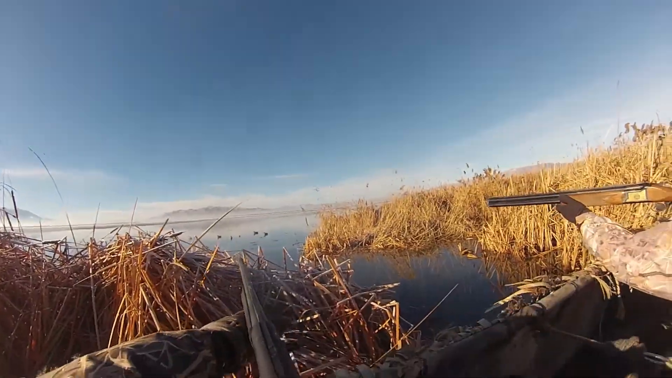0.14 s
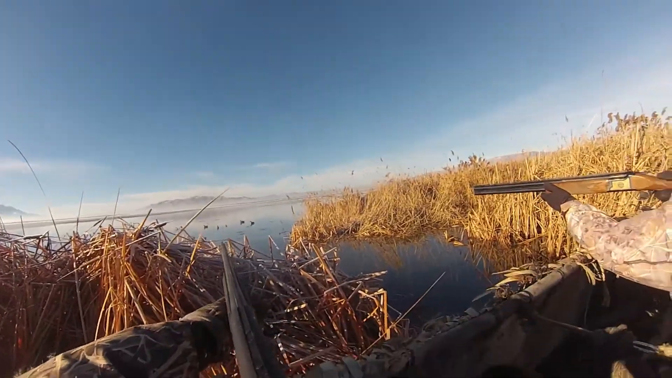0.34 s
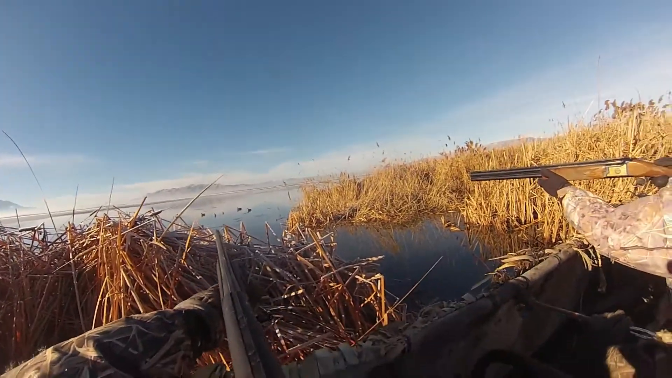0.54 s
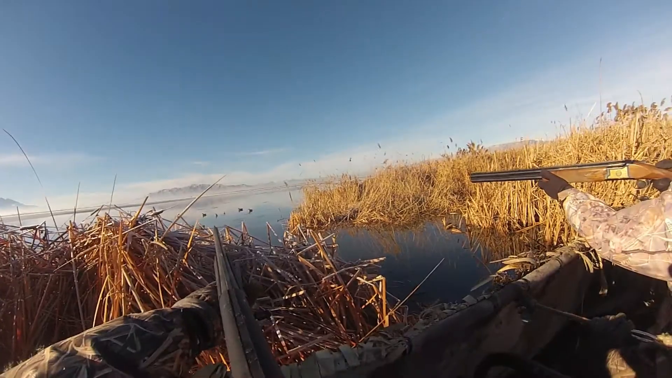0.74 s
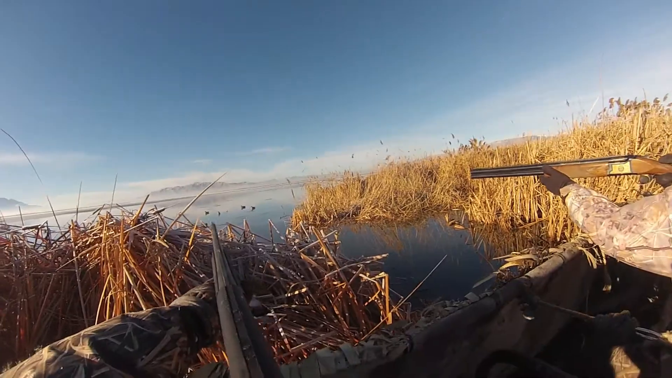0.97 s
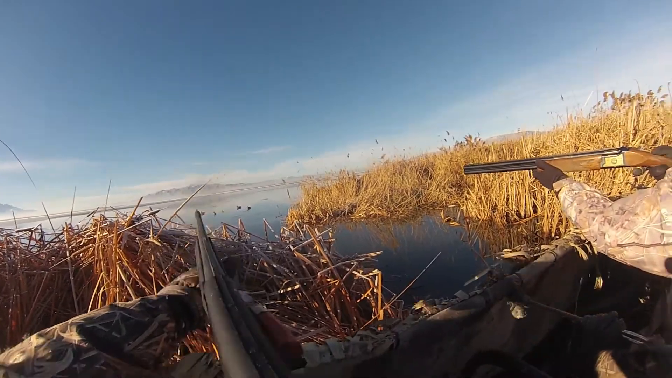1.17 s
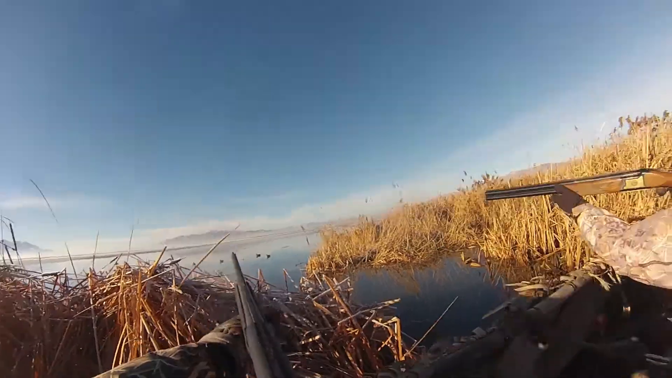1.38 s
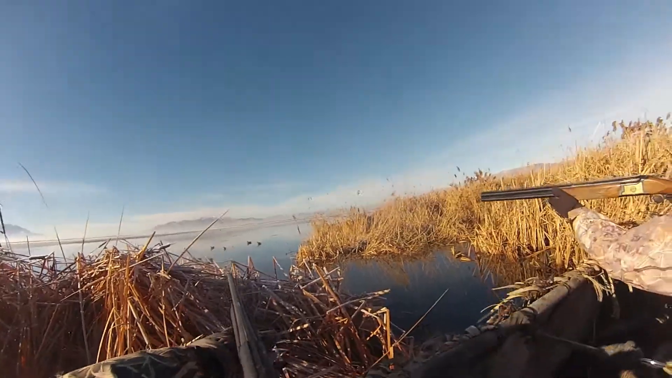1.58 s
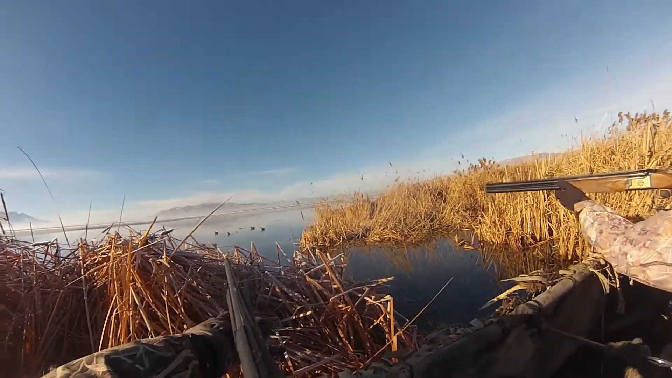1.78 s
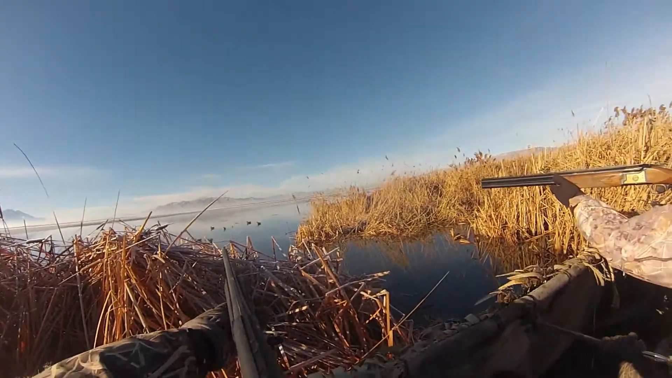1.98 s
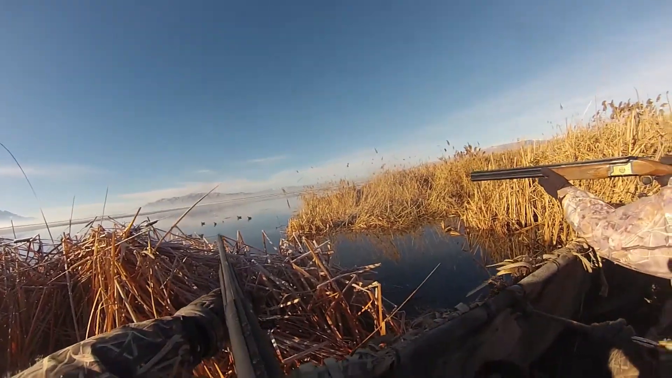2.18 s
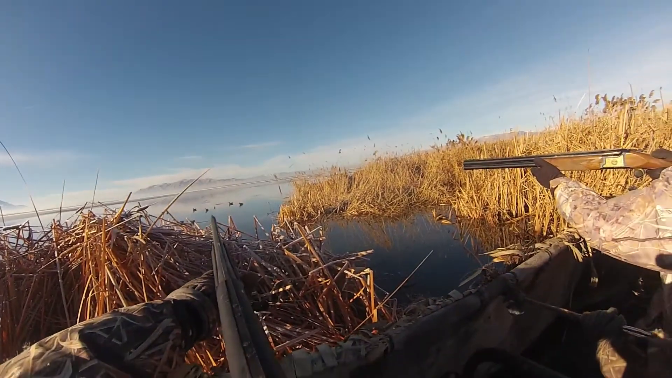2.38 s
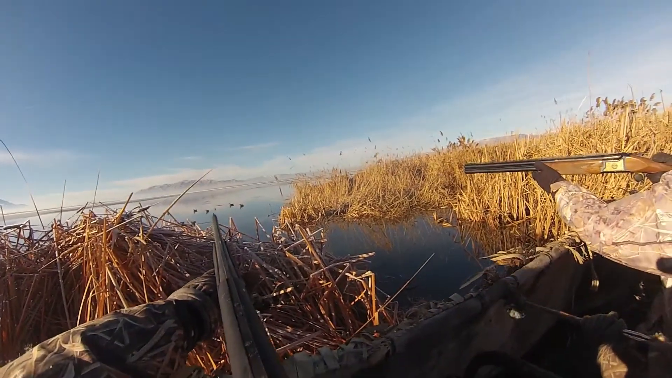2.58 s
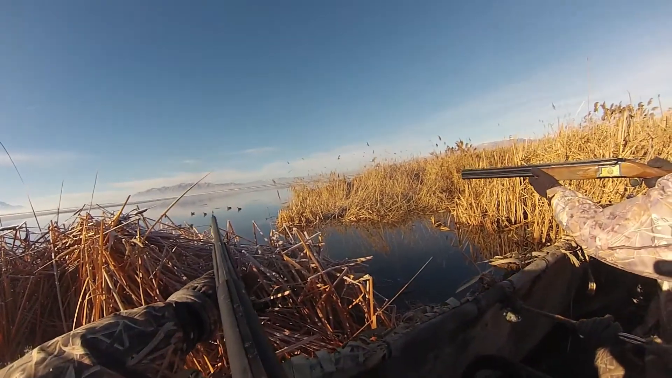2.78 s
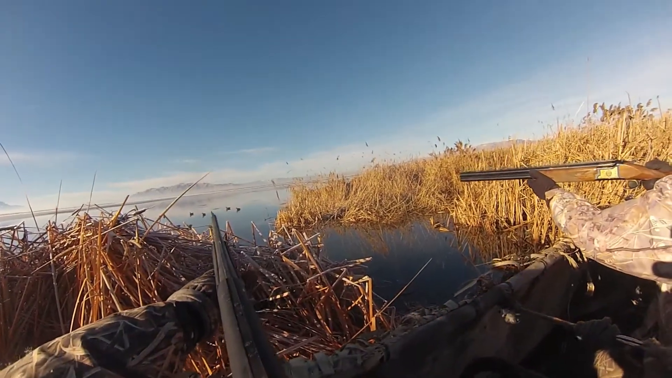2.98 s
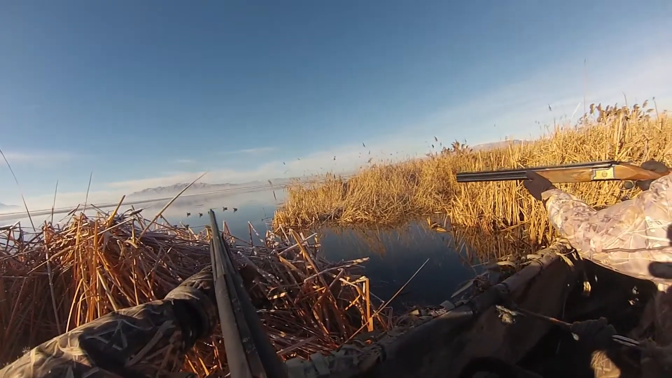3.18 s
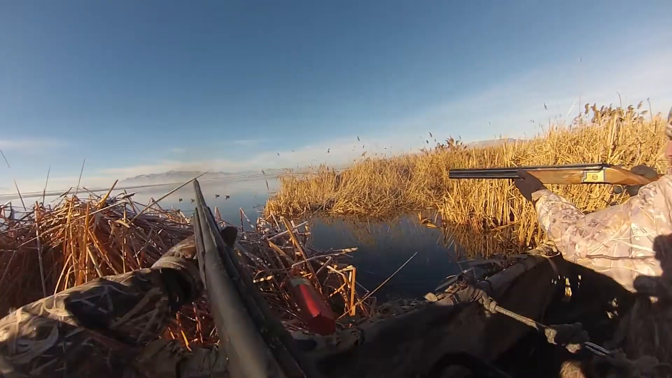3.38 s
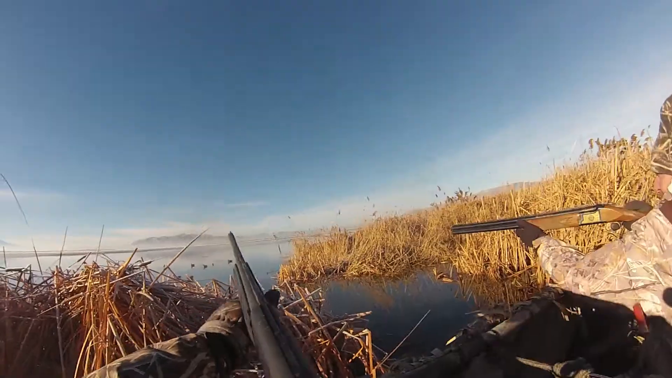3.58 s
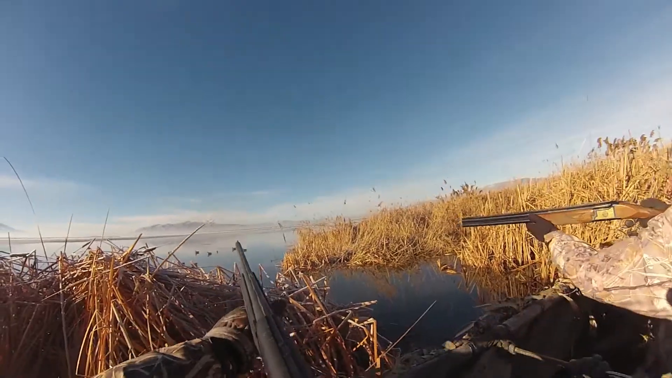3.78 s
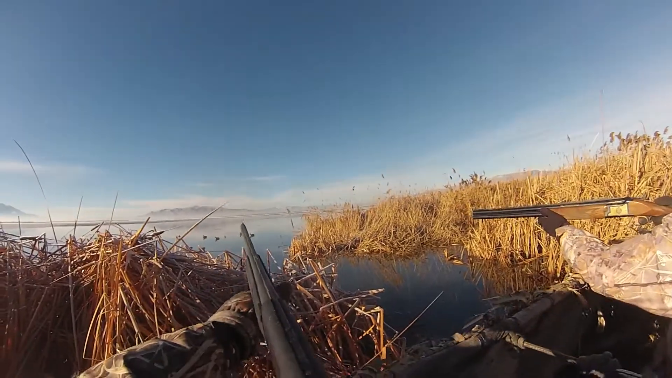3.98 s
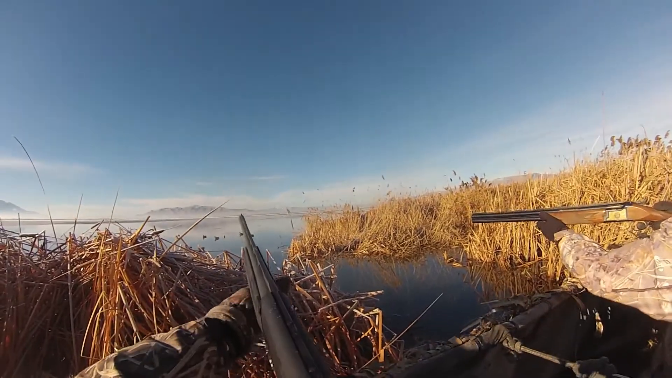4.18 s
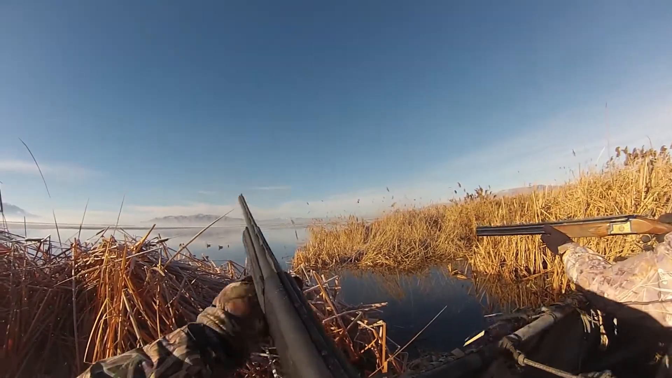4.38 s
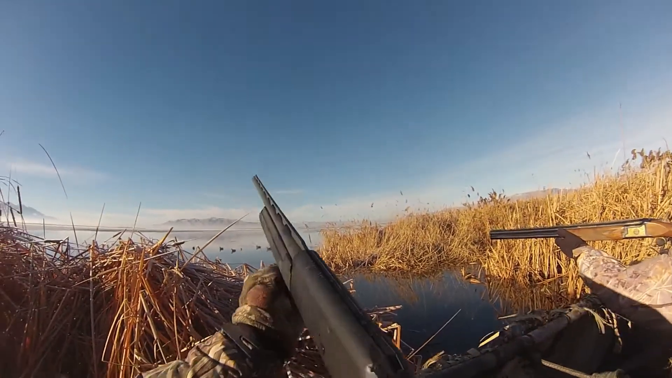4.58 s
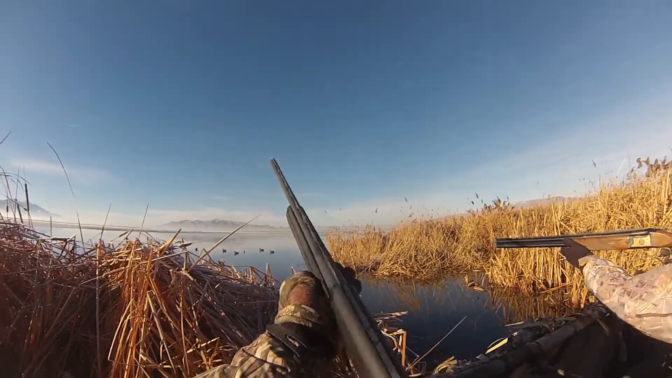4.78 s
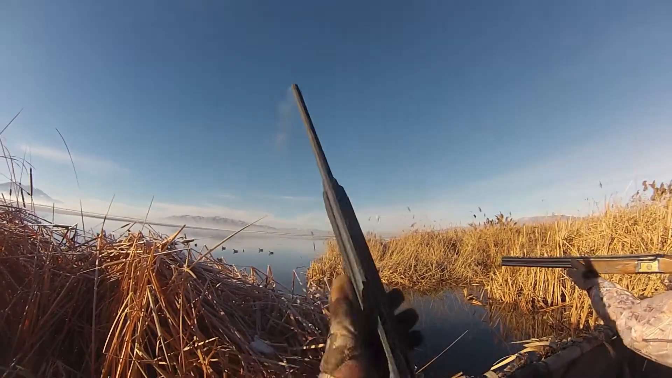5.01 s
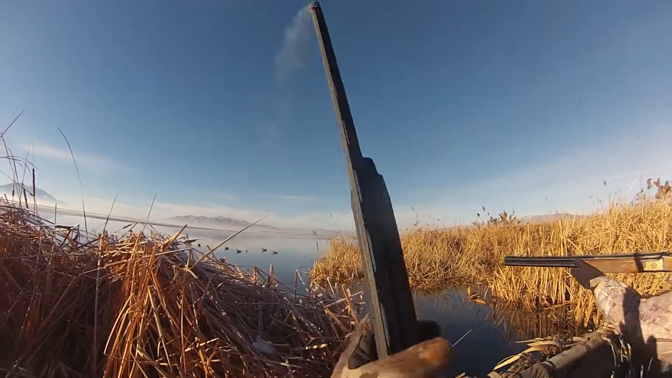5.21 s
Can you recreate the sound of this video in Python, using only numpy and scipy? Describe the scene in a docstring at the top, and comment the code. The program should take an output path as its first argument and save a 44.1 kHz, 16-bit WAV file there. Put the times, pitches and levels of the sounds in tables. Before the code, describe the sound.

Two close shotgun blasts almost together, then a third, each rolling away over open marsh, with small knocks and clicks between.

```python
"""The echo of an earlier shot dies away over a calm marsh. Two hunters then fire shotguns from a small
boat hidden in reeds, so close to a camera that its microphone overloads. Each blast is a pair of
pressure fronts that scatter in the reeds and roll back from the far shore and hills, duller with
distance. Spent shells and gear excite the boat's resonant modes, and a sleeve rustles by friction
as a gun is raised."""
import sys
import numpy as np
from scipy import signal
from scipy.fft import rfft, irfft
from scipy.io import wavfile
from scipy.ndimage import uniform_filter1d

SR = 44100
rng = np.random.default_rng(int(sys.argv[2]) if len(sys.argv) > 2 else 0)


def wrap_up_sound(samples):
    """Save the sound to the file named by the first command line argument, as 16-bit audio."""
    columns = np.atleast_2d(samples).T
    # keep every value between -1 and 1, then stretch to whole-number steps
    tamed = np.clip(columns, -1, 1)
    steps = np.round(tamed * 32767).astype(np.int16)
    wavfile.write(sys.argv[1], SR, steps)


N = 231425

# Spectrum of the muzzle crack (frequency [Hz], level [dB])
CRACK_SPECTRUM = [(60, -40), (250, -14.5), (600, -2), (1200, -5), (1900, -3), (2900, 0), (4200, -4),
                  (7000, -7), (10000, -6), (15000, -13.5)]


def undb(db):
    """Amplitude ratio of a level in decibels."""
    return 10 ** (np.asarray(db) / 20)


def unit(x):
    """Normalisation to an rms of 1."""
    return x / np.sqrt(np.mean(x ** 2))


def clock(seconds):
    """Sample times in seconds."""
    return np.arange(int(seconds * SR)) / SR


def fade(t, t60):
    """Exponential decay from t = 0, falling 60 dB in t60 seconds."""
    return (t >= 0) * np.exp(-np.log(1000) * np.abs(t) / t60)


def ring(t, hz, t60):
    """Free vibration of one struck mode: a damped sinusoid."""
    return np.sin(2 * np.pi * hz * t) * fade(t, t60)


def add(out, start, sound):
    """Superposition: mix a sound in at a time in seconds; what falls outside is lost."""
    i = int(round(start * SR))
    lo, hi = max(i, 0), min(i + len(sound), len(out))
    if hi > lo:
        out[lo:hi] += sound[lo - i:hi - i]


def noise(spectrum, size):
    """Spectral shaping: noise of rms 1 that follows (frequency [Hz], level [dB]) points."""
    hz, db = np.transpose(spectrum)
    bin_hz = np.maximum(np.fft.rfftfreq(size, 1 / SR), 1)
    gain = undb(np.interp(np.log(bin_hz), np.log(hz), db))
    return unit(irfft(rfft(rng.standard_normal(size)) * gain, size))


def walk(rate, size):
    """Random modulation: ramps between `rate` random values a second, with a spread near 1."""
    hold = max(int(SR / rate), 1)
    steps = np.repeat(rng.standard_normal(size // hold + 1), hold)
    return unit(uniform_filter1d(steps, hold))[:size]


def bell(hz, centre_hz, octaves):
    """Gaussian weighting of height 1 on a logarithmic frequency axis."""
    return np.exp(-(np.log2(hz / centre_hz) / octaves) ** 2)


def air():
    """Ambient noise: the low, slightly restless rumble of a calm morning."""
    # Spectrum of the rumble (frequency [Hz], level [dB])
    air_spectrum = [(12, -31), (20, -7), (42, 1), (122, -6.5), (157, -8.5), (259, -12.5), (298, -21.5),
                    (404, -16.5), (881, -27), (958, -30.5), (1720, -36), (6720, -43), (15500, -49.5)]
    return noise(air_spectrum, N) * undb(-65 + 0.73 * walk(12, N))


def sleeve():
    """Friction noise: cloth slides over dry stems in tiny catches; each stroke builds, holds and dies."""
    # Spectrum of rubbing cloth (frequency [Hz], level [dB])
    cloth_spectrum = [(100, -6.5), (300, 0.5), (550, 2), (1000, -6.5), (2400, -11.5), (3600, -16.5),
                      (8000, -21.5), (15000, -28)]
    # Sleeve strokes (time [s], duration [s], level [dB], favoured frequency [Hz], boost [dB])
    strokes = [(0, .07, -84, 5000, -2), (2.119, 0.15, -80.5, 2200, 3), (3.12, 0.14, -87, 1890, 13),
               (4.378, .15, -71, 1291, -0.5), (4.532, .05, -71.5, 9100, 10), (4.701, .18, -63.5, 2400, 4),
               (5.024, .06, -68.5, 2440, 8), (5.12, .15, -74.5, 3000, 3)]
    attack_s, release_s, lead_s = 0.037, .035, 1 / 4
    catch_db, catches_per_s = 1.5, 140
    out, t = np.zeros(N), clock(0.8) - lead_s
    hz = np.geomspace(100, 15000, 40)
    cloth_db = np.interp(hz, *np.transpose(cloth_spectrum))
    for start, length, db, pitch_hz, boost_db in strokes:
        colour = np.column_stack([hz, cloth_db + boost_db * bell(hz, pitch_hz, octaves=0.51)])
        pressure = np.exp(np.minimum(t, 0) / attack_s - np.maximum(t - length, 0) / release_s)
        swish = noise(colour, len(t)) * pressure
        add(out, start - lead_s, swish * undb(db + catch_db * walk(catches_per_s, len(t))))
    return out


def knocks():
    """Impact excitation: shells and gear tick, clatter and ring the modes that the struck spot favours."""
    # Modes of the boat (frequency [Hz], level [dB], decay time t60 [s])
    boat_modes = [(201, -11, 0.095), (267, -3, 0.037), (391.4, 1.5, 0.1), (487.6, -2, 0.14),
                  (538.3, 4, 0.088), (603, 5.5, 0.019), (710, -10, 0.017), (914, -5.5, 0.1),
                  (1130, -9.5, 0.11), (1230, -19.5, 0.13), (1560, -49, .045), (1620, -32, 0.079),
                  (1604, -9.5, 0.11), (1787, 6, 0.023), (1900, 5, 0.019), (2350, -47, .035),
                  (2795, -5, 0.026), (3965, -5.5, 0.026)]
    # Shells, gun parts and gear hitting the boat (time [s], rise time [s], ring level [dB],
    # favoured frequency [Hz], boost [dB], clatter level [dB], tick level [dB])
    impacts = [(.084, 0.00069, -67, 1860, 8, -60, -78), (0.2374, 0.0013, -32, 355, 6.5, -29, -49),
               (0.4549, 0.0014, -51, 453, 16, -45.5, -68), (.513, 0.0095, -60, 452, 20.5, -58, -81),
               (1.709, 0.0015, -44, 1290, 15, -34, -35.5), (1.890, 0.0011, -63, 1500, 1, -59.5, -65),
               (2.099, 0.0022, -52, 260, 15, -39.5, -46), (3.9745, 0.00035, -40.5, 234, 18.5, -36.5, -50),
               (3.978, 0.00025, -34.5, 569, 13.5, -26, -66), (4.012, .0003, -69, 1500, 3, -69, -55),
               (4.165, 0.0011, -66, 1109, 24, -47, -44.5), (4.307, 0.0018, -54.5, 222, 27.5, -61.5, -84),
               (4.315, 0.0016, -66.5, 450, 11, -59, -66), (4.428, .001, -66.5, 1190, 16, -63, -71),
               (4.655, .0005, -70, 1500, -8, -79, -69), (5.021, 0.00084, -72, 2000, -9, -64, -57)]
    # Spectra of the midrange clatter and the brighter tick (frequency [Hz], level [dB])
    clatter_spectrum = [(150, -21), (400, 3.5), (900, 10), (1800, 3.5), (2800, -3), (3500, -17.5),
                        (4500, -15), (9000, -42), (15000, -44)]
    tick_spectrum = [(500, -9), (1500, 4.5), (4000, -4.5), (7500, -8), (12000, -13), (15000, -28)]
    out, t = np.zeros(N), clock(1 / 4)
    for start, rise, ring_db, spot_hz, boost_db, clatter_db, tick_db in impacts:
        body = 0
        for hz, db, t60 in boat_modes:
            mode_db = db + boost_db * bell(hz, spot_hz, octaves=0.29)
            amplitude = rng.choice([-1, 1]) * undb(mode_db + rng.standard_normal())
            body = body + amplitude * ring(t, hz, t60)
        clatter = noise(clatter_spectrum, len(t)) * fade(t, t60=0.073)
        tick = noise(tick_spectrum, len(t)) * fade(t, t60=0.055) * undb(2 * walk(580, len(t)))
        knock = undb(ring_db) * body + undb(clatter_db) * clatter + undb(tick_db) * tick
        add(out, start, knock * (1 - np.exp(-t / rise)))
    # The knocks carry little bass below 140 Hz.
    return signal.sosfilt(signal.butter(3, 140, "high", fs=SR, output="sos"), out)


def absorb(x, db_per_s, power):
    """Absorption: later sound has come further, losing db_per_s at 1 kHz and more in the treble."""
    hz, t, frames = signal.stft(x, SR, nperseg=512)
    loss_db = db_per_s * (hz[:, None] / 1000) ** power * t
    return signal.istft(frames * undb(-loss_db), SR)[1][:len(x)]


def returns(t, spectrum, level_db, clump_db=1.5):
    """Diffuse reflection: countless overlapping echoes merge into noise, arriving in uneven clumps."""
    clumps = walk(220, len(t)) + walk(40, len(t)) / 2
    return noise(spectrum, len(t)) * undb(level_db + clump_db * clumps)


def swell(t, arrival_s, hold_s, rise_db_per_s, fall_db_per_s):
    """Echo envelope in dB: it builds, holds at 0 while the ground keeps answering, then decays."""
    early, late = np.maximum(arrival_s - t, 0), np.maximum(t - arrival_s - hold_s, 0)
    return -rise_db_per_s * early - fall_db_per_s * late


def hills_echo(t):
    """Distant reflection: the hills answer last, with a long, low rumble."""
    # Spectrum returned by the hills (frequency [Hz], level [dB])
    hills_spectrum = [(40, -17.5), (110, -11.5), (190, 0.5), (290, 2), (420, -4), (650, -21.5), (1200, -27),
                      (3000, -36), (7000, -44), (14000, -49.5)]
    level_db = -45 + swell(t, arrival_s=.265, hold_s=0.041, rise_db_per_s=190, fall_db_per_s=38)
    return returns(t, hills_spectrum, level_db)


def shore_echo(t):
    """Reflection from the far shore: a roll that absorption dulls as its path lengthens."""
    # Spectrum returned by the shore (frequency [Hz], level [dB])
    shore_spectrum = [(30, -23.5), (80, -23.5), (160, -15), (260, -2.5), (380, 2.5), (520, 3.5), (720, -9),
                      (1300, -15.5), (2500, -29.5), (5000, -38.5), (14000, -43.5)]
    level_db = -30.5 + swell(t, arrival_s=.138, hold_s=0.14, rise_db_per_s=330, fall_db_per_s=113)
    return absorb(returns(t, shore_spectrum, level_db), db_per_s=16.0, power=.6)


def slaps(t):
    """Discrete reflections: reed walls and the bank return brief bursts with the crack's spectrum."""
    # Reflections of a shot (delay [s], level [dB])
    reflections = [(.036, -25.5), (.05, -33), (.08, -31.5), (.144, -24.5)]
    envelope = sum(undb(db) * np.exp(-((t - delay) / 0.0016) ** 2) for delay, db in reflections)
    return noise(CRACK_SPECTRUM, len(t)) * envelope


def reed_echo(t):
    """Scattering: the boat and nearest stems answer at once, and the reed bed hisses on."""
    # Spectrum returned by the boat and nearest stems (frequency [Hz], level [dB])
    near_spectrum = [(24, -42.5), (40, -8.5), (313, 1), (824, -6.5), (1350, -2.5), (2520, -12), (2920, -12),
                     (3650, -11.5), (5430, -14), (5990, -16), (12300, -21.5), (13300, -21), (15000, -33.5)]
    # Spectrum scattered by the reed bed (frequency [Hz], level [dB])
    reed_spectrum = [(40, -16.5), (120, -14), (250, -8), (470, -2.5), (750, -3), (1400, 0.5), (2900, -2.5),
                     (4500, -8), (9000, -8), (15000, -8.5)]
    hold_s, sag_db_per_s, fall_db_per_s = 0.22, 16, 310
    near = undb(-13.5) * noise(near_spectrum, len(t)) * fade(t, t60=0.097)
    bed_db = -31.5 - sag_db_per_s * t - fall_db_per_s * np.maximum(t - hold_s, 0)
    bed = returns(t, reed_spectrum, bed_db, clump_db=1.97) + slaps(t)
    return near + absorb(bed, db_per_s=19.5, power=.85)


def echoes(reed_db, far_db):
    """Multipath propagation: one shot returns from the reeds, the shore and the hills in turn."""
    t = clock(3 / 2)
    near = undb(reed_db) * reed_echo(t)
    far = undb(far_db) * (shore_echo(t) + hills_echo(t))
    return (near + far) * (1 - np.exp(-t / 0.002))


def blast(first_db, lag, second_db, boom_hz, boom_db, punch_db, case_db):
    """Muzzle blast: of two gas fronts, the first rings the camera case, the second booms and punches."""
    t = clock(1 / 10)
    first_front = undb(first_db) * np.exp(-(t / .0028) ** 2)
    second_front = undb(second_db) * (t >= lag) * np.exp(-((t - lag) / 0.0051) ** 2)
    crack = noise(CRACK_SPECTRUM, len(t)) * (first_front + second_front)
    boom = undb(boom_db) * ring(t - lag, boom_hz, t60=.024)
    punch = undb(punch_db) * ring(t - lag, hz=490, t60=.016)
    case = undb(case_db) * ring(t, hz=1190, t60=.024)
    return crack - boom - punch + case


def guns():
    """Direct and reflected sound: every shotgun blast is followed by its echoes."""
    # Shots (time [s], first front level [dB], second front lag [s], second front level [dB],
    # boom frequency [Hz], boom level [dB], punch level [dB], case ring level [dB],
    # reed echo level [dB], far echo level [dB])
    shots = [(-0.41, 0, .0045, 0, 100, -10, -10, -10, -5, -2),
             (1.2506, -5, 0.0033, -2, 135, -9.5, -9, -5, 1.5, -6.5),
             (1.3481, -4.5, 0.0017, -14.5, 185, -10, -0.5, -26, 0.5, -1),
             (3.4384, -5.5, 0.0034, -1, 135, -8.5, -8, -4.5, 2.5, -2)]
    out = np.zeros(N)
    for start, *muzzle, reed_db, far_db in shots:
        add(out, start, blast(*muzzle))
        add(out, start, echoes(reed_db, far_db))
    return out


def scene():
    """Superposition of shots, knocks, rustling and the still air of the marsh, in one channel."""
    return (guns() + knocks() + sleeve() + air())[None]


def record(dry):
    """Saturation and band limiting: the blasts overload the microphone; deep bass and the top are cut."""
    ceiling, bottom_hz, top_hz = .9, 22, 15500
    drive = dry / ceiling
    overloaded = ceiling * drive / (1 + drive ** 6) ** (1 / 6)
    thinned = signal.sosfilt(signal.butter(1, bottom_hz, "high", fs=SR, output="sos"), overloaded)
    return signal.sosfilt(signal.ellip(12, .1, 90, top_hz, fs=SR, output="sos"), thinned)


dry = scene()
out = record(dry)
wrap_up_sound(out)
```